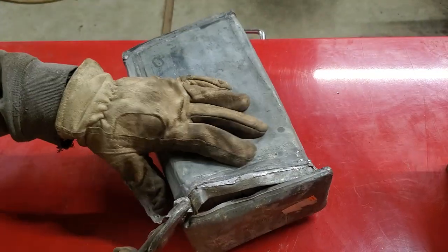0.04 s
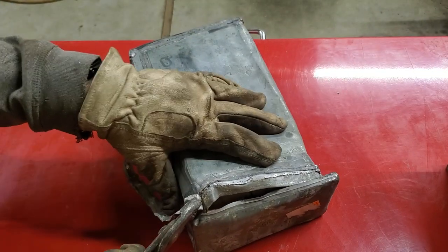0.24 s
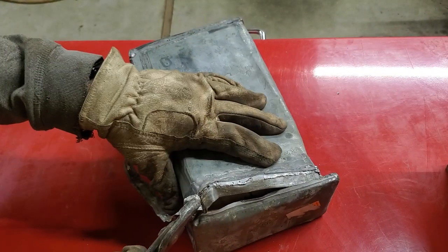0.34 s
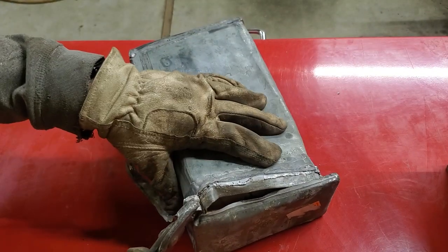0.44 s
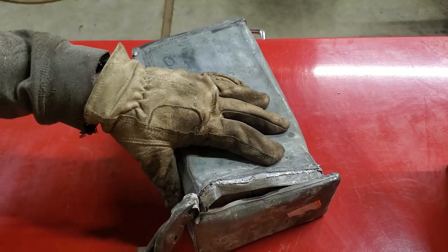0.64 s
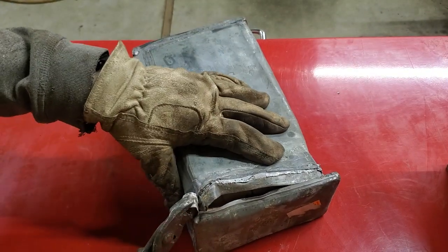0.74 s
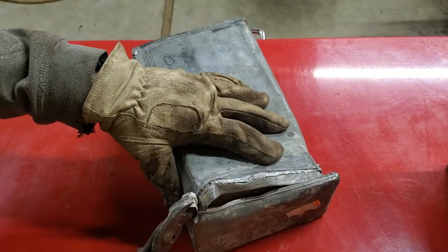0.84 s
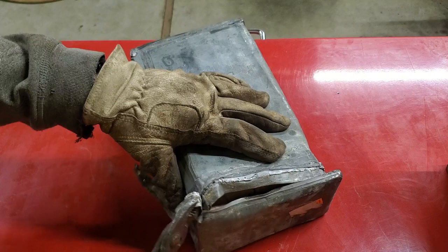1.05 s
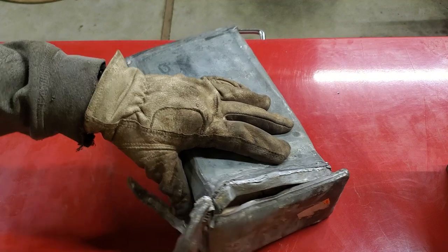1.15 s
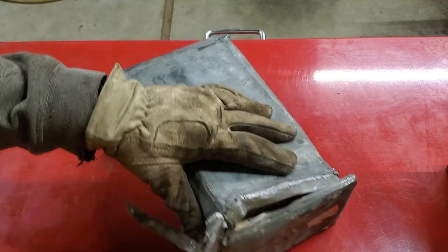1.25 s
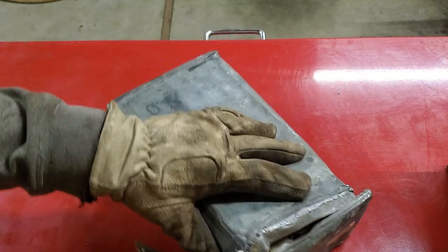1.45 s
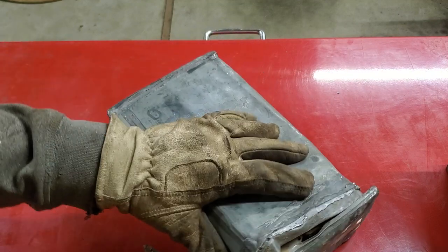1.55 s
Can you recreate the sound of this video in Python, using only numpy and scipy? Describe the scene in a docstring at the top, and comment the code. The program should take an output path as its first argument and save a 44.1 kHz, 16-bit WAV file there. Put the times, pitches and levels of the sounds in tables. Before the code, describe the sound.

Close stereo pickup in a workshop: a thin metal box rubs on a bench, clatters loudly early, snaps and clicks in the middle, then is set down with a lighter, jingling double knock and low thumps.

```python
"""A gloved hand rocks and turns a sheet-metal tin on a steel bench; two close microphone ports listen.
Throughout, the base rubs (lumpy rumble and fine hiss) over a faint mains hum. First the tin knocks on the
bench (low modes, clatter, crack) and a loose bit jingles (many small touches ringing high modes).
Then come dull ticks (single modes), seam snaps (noise bursts) and tool clicks (scrapes ringing modes).
The turned tin knocks and jingles again, and two thumps follow. Every hit leaves a diffuse room tail."""
import sys
import numpy as np
from scipy import signal
from scipy.fft import rfft, irfft
from scipy.io import wavfile
from scipy.ndimage import uniform_filter1d

SR = 44100
rng = np.random.default_rng(int(sys.argv[2]) if len(sys.argv) > 2 else 0)


def transcribe(u):
    """Save the signal u as a 16-bit wav file named by the first command-line argument.

    u: samples, shape (n,) or (channels, n), limited to [-1, 1]; the rate is SR.
    q: integer samples, one column per channel.
    """
    v = np.clip(np.atleast_2d(u).T, -1, 1)
    q = np.round(v * 32767).astype(np.int16)
    wavfile.write(sys.argv[1], SR, q)


def boost(x):
    """Linear amplitude factor 10**(x/20) for a level x in decibels (scalar or array-like)."""
    u = np.asarray(x, float) / 20
    return 10 ** u


N = 72765  # length in samples


def evened(x):
    """Scales a sound to rms 1."""
    return x / np.sqrt(np.mean(x ** 2) + 1e-20)


def read(points, hz):
    """Reads a table between its points, on a log-frequency axis."""
    f, value = np.transpose(points)
    return np.interp(np.log(hz + 1), np.log(f + 1), value)


def add(mix, s, sound):
    """Mixes a two-row sound (mid, side) in at time s, cutting it at the end."""
    part = mix[:, round(s * SR):][:, :sound.shape[1]]
    part += sound[:, :part.shape[1]]


def coloured(colour, size):
    """Two rows of noise, shaped to the given spectrum and scaled to rms 1."""
    spectrum = rfft(rng.standard_normal((2, size)))
    gain = boost(read(colour, np.fft.rfftfreq(size, 1 / SR)))
    return evened(irfft(spectrum * gain, size))


def dying(x, t60):
    """Lets every frequency band fall by 60 dB in its own time, as treble and bass die differently."""
    hz, t, bands = signal.stft(x, SR, nperseg=256)
    band_t60 = np.maximum(read(t60, hz), .01)[:, None]
    faded = bands * boost(-60 * t / band_t60)
    return signal.istft(faded, SR, nperseg=256)[1][:, :x.shape[1]]


def lumps(smooth_s):
    """Random wander of rms 1, made slower by smoothing noise twice."""
    size = round(smooth_s * SR)
    once = uniform_filter1d(rng.standard_normal(N), size)
    return evened(uniform_filter1d(once, size))


def burst(colour, db, t60):
    """A crack of coloured noise: a rise of 0.57 ms, then a steady fall in dB."""
    t = np.arange(SR // 3) / SR
    rise = np.minimum(t / 0.00057, 1)
    return coloured(colour, len(t)) * rise * boost(db - 60 * t / t60)


# mains hum: (f/Hz, level/dB)
HUM_TONES = [(120, -62.5)]


def hum():
    """Steady mains tone that starts at a random point of its cycle."""
    t = np.arange(N) / SR
    return sum(boost(db) * np.sin(2 * np.pi * (hz * t + rng.random())) for hz, db in HUM_TONES)


# how long the workshop rings: (f/Hz, 60 dB fall time/s)
ROOM_FADE = [(100, 1), (1000, 0.22), (6000, 0.36), (14000, 0.23)]


def room(hits):
    """Diffuse tail of the workshop: dying noise, 6 ms late, follows every hit."""
    tail = dying(rng.standard_normal((2, SR // 2)), ROOM_FADE)
    tail = np.pad(tail / np.linalg.norm(tail[0]), ((0, 0), (round(.006 * SR), 0)))
    return signal.fftconvolve(hits, tail, axes=1)[:, :N]


# how strongly the base rubs: (t/s, rumble level/dB, hiss level/dB, top hiss level/dB)
RUB_LEVELS = [(0.0, -47, -52.5, -52), (0.156, -42.5, -53.5, -48.5), (0.248, -57, -60.5, -62),
              (0.39, -37.5, -63, -67), (0.578, -47, -55, -52.5), (0.72, -42.5, -52.5, -50.5),
              (0.836, -47, -58, -66), (0.988, -43.5, -57, -59.5), (1.268, -49.5, -57, -51),
              (1.392, -47.5, -53.5, -49), (1.488, -48, -54, -49), (1.65, -41.5, -54, -52)]
# spectra of rumble, hiss and top hiss: (f/Hz, relative level/dB per Hz)
RUMBLE_COLOUR = [(15, -58), (25, -71), (44, 0.5), (65, -0.5), (248, -9.5), (300, -15.5), (394, -13),
                 (468, -14), (537, -14), (1500, -37.5), (1950, -24), (3300, -120)]
HISS_COLOUR = [(410, -4), (700, 2), (1530, -1.5), (1810, -3.5), (2530, 0), (2800, -3.5), (6520, -3),
               (8000, -9), (10400, -63), (17600, -120)]
TOP_COLOUR = [(4710, -73), (8000, -14), (11300, 1), (13900, -2.5), (15800, -9), (16300, -46), (16500, -58)]


def rubbing():
    """Friction of the base on the bench: lumpy rumble and gritty fine hiss."""
    s, rumble_db, hiss_db, top_db = np.transpose(RUB_LEVELS)
    t = np.arange(N) / SR
    grit_db = 0.5 * lumps(0.0037)
    lumps_db = 1 * lumps(0.0015)
    rumble = coloured(RUMBLE_COLOUR, N) * boost(np.interp(t, s, rumble_db) + lumps_db)
    hiss = coloured(HISS_COLOUR, N) * boost(np.interp(t, s, hiss_db))
    top_hiss = coloured(TOP_COLOUR, N) * boost(np.interp(t, s, top_db))
    return rumble + (hiss + top_hiss) * boost(grit_db)


# dull ticks and thumps of handling: (t/s, level/dB, f/Hz, 60 dB fall time/s)
TICK_EVENTS = [(0.601, -44, 2080, 0.019), (.642, -44, 538, 0.084), (.683, -29, 240, 0.038),
               (0.7144, -42.5, 2970, 0.034), (.714, -46.5, 1357, .06), (0.76, -47.5, 1425, 0.067),
               (0.76, -46.5, 1004, 0.064), (0.956, -51, 226, 0.1), (1.0174, -32.5, 265, 0.047),
               (1.366, -31, 162, 0.11), (1.404, -37, 216, 0.14)]


def ticks(hits):
    """Each touch rings one panel: a single damped mode, swelling over its first cycle."""
    t = np.arange(SR // 5) / SR
    for s, db, hz, t60 in TICK_EVENTS:
        swell = np.minimum(t * hz, 1)
        mode = boost(db - 60 * t / t60) * swell * np.sin(2 * np.pi * hz * t)
        add(hits, s, np.ones((2, 1)) * mode)


# tool clicking on the seam: (t/s, level/dB, 60 dB fall time of the scrape/s)
CLICK_EVENTS = [(0.9069, -35, 0.027), (0.9506, -34, 0.033), (0.9665, -34.5, 0.021), (1.0174, -40, 0.013)]
# modes of the tool's tip: (f/Hz, relative level/dB before division by root of fall time, 60 dB fall time/s)
TIP_MODES = [(1230, -7, .012), (2570, -7, .012), (3800, -4, .003), (5300, 0, .004), (6300, -1, .007),
             (8800, -2, .002), (11500, -3, .003), (14000, -6, .0015)]


def clicks(hits):
    """A short scrape of noise rings the modes of the tool's tip."""
    t = np.arange(SR // 10) / SR
    modes = 0
    for hz, level_db, ring_s in TIP_MODES:
        # the root keeps short and long modes comparable in energy
        modes = modes + boost(level_db - 60 * t / ring_s) * np.sin(2 * np.pi * hz * t) / np.sqrt(ring_s)
    for s, db, t60 in CLICK_EVENTS:
        scrape = rng.standard_normal((2, len(t))) * boost(-60 * t / t60)
        ringing = signal.fftconvolve(scrape, modes[None], axes=1)
        add(hits, s, boost(db) * ringing / np.linalg.norm(modes))


# seam snapping: (t/s, level/dB, 60 dB fall time/s)
SNAP_EVENTS = [(0.581, -54, 0.042), (.616, -44, 1), (0.7144, -25, 0.28), (0.7253, -31.5, 0.05),
               (0.777, -39, .12), (1.0185, -48, 0.29)]
# bright spectrum of a snap: (f/Hz, relative level/dB per Hz)
SNAP_COLOUR = [(470, -55), (800, -43), (2100, -38), (2600, -23), (6550, -7), (7720, -10.5), (11400, 4.5),
               (15500, -4), (16500, -20)]


def snaps(hits):
    """The seam lets go: a bright noise burst that opens with a sharp tip."""
    for s, db, t60 in SNAP_EVENTS:
        add(hits, s, burst(SNAP_COLOUR, db, t60))
        add(hits, s, burst(SNAP_COLOUR, db + 9, .018))  # tip: 9 dB stronger, gone fast


# loose bit rattling after a knock: (strongest at t/s, level/dB, spread/s)
RATTLE_EVENTS = [(0.249, -34, 0.017), (0.289, -37.5, 0.012), (0.375, -40, 0.0028), (1.303, -30, 0.013)]
# modes of the loose bit: (f/Hz, relative level/dB, 60 dB fall time/s)
JINGLE_MODES = [(9840, -6, .022), (10450, -8, .018), (11430, -8, .015), (11860, -2, .05),
                (12190, -10, .015), (13600, -6, .025), (14250, -1, .03), (14700, -8, .015),
                (15090, -7, .02)]


def rattles(hits):
    """Many small touches, swelling and fading, each ringing the modes differently."""
    touches_per_s, left_share = 1500, 0.71
    t = np.arange(SR // 4) / SR
    for s, level_db, spread_s in RATTLE_EVENTS:
        swell = np.exp(-.5 * (t / spread_s - 2) ** 2)  # peaks two spreads in
        touches = (rng.random(len(t)) < touches_per_s / SR) * swell
        jingle = 0
        for hz, db, t60 in JINGLE_MODES:
            mode = boost(db - 60 * t / t60) * np.sin(2 * np.pi * hz * t)
            strikes = touches * rng.standard_normal((2, len(t)))
            jingle = jingle + signal.oaconvolve(strikes, mode[None], axes=1)[:, :len(t)]
        mid, side = jingle
        leaning = np.array([mid, side + left_share * mid])  # mid copied to side leans left
        add(hits, s - 2 * spread_s, boost(level_db) * leaning)


# tin knocking on the bench: (t/s, ring level/dB, clatter level/dB, crack level/dB, 0 before or 1 after the turn)
KNOCK_EVENTS = [(0.2215, -18, -22, -22.5, 0), (.235, -21.5, -25.5, -17, 0), (.2412, -20.5, -31.5, -26, 0),
                (0.26, -23.5, -33, -28, 0), (0.3635, -21.5, -31, -35, 0), (1.2732, -28, -26, -28.5, 1),
                (1.288, -24.5, -33.5, -44, 1), (1.3136, -27.5, -43, -39, 1)]
# modes of tin and bench, one list before and one after the turn:
# (f/Hz, relative level/dB, 60 dB fall time/s, held to 0.22 s at most)
BODY_MODES = [
    [(96.2, 0, 0.11), (164, -6, .22), (262.6, -5, 0.17), (322, -13.5, 0.35), (376.4, -8, 0.1),
     (459.8, -11.5, 0.18), (538, -3.5, 0.063), (607, -9.5, .12), (658, -28, 0.16), (826, -25, 0.31),
     (993, -19.5, .16)],
    [(87.5, -4, .12), (161, -5.5, .25), (208.6, -1, 0.095), (269, -6.5, 0.1), (401.5, -11, 0.25),
     (450, -8, 0.16), (520.3, -9, 0.19), (704, -4, 0.051), (826, -27, 0.14)],
]
# spectra of clatter and crack: (f/Hz, relative level/dB per Hz)
CLATTER_COLOUR = [(24, -39), (40, -57), (130, -3.5), (345, -4), (660, -6), (780, -16.5), (1680, -18),
                  (5440, -20), (7730, -23.5), (11600, -20), (16000, -32)]
CRACK_COLOUR = [(500, -1), (1800, -12.5), (4000, -2.5), (5500, 5.5), (8000, -4), (11000, 5), (16500, -13)]
# how long the clatter lasts: (f/Hz, 60 dB fall time/s)
CLATTER_FADE = [(60, 0.8), (300, 0.24), (1000, 0.26), (4000, 0.22), (12000, 0.32)]


def knocks(hits):
    """Tin strikes bench: low modes ring, sheet metal clatters, and the touch itself cracks."""
    t = np.arange(SR // 2) / SR
    for s, ring_db, clatter_db, crack_db, turned in KNOCK_EVENTS:
        ring = 0
        for k, (hz, db, t60) in enumerate(BODY_MODES[int(turned > .5)]):
            mode = boost(db - 60 * t / min(t60, .22)) * np.sin(2 * np.pi * hz * t)
            ring = ring + mode * [[1], [.5 * (-1) ** k]]  # modes lean left and right in turn
        rise = np.minimum(t / 0.00033, 1)
        clatter = dying(coloured(CLATTER_COLOUR, len(t)), CLATTER_FADE) * rise
        add(hits, s, -boost(ring_db) * ring + boost(clatter_db) * clatter)
        add(hits, s, burst(CRACK_COLOUR, crack_db, 0.035))


def scene():
    """All sounds as two rows, mid (left plus right) and side (left minus right)."""
    hits = np.zeros((2, N))
    ticks(hits)
    clicks(hits)
    snaps(hits)
    rattles(hits)
    knocks(hits)
    return hum() + boost(-13) * room(hits) + rubbing() + hits


def low_pass(x):
    """Removes everything above the highest recorded frequency."""
    return signal.sosfilt(signal.butter(12, 16800, fs=SR, output="sos"), x)


# treble shape: a dip near 8 kHz and a cutoff at the top near 16 kHz: (f/Hz, level/dB)
TREBLE_SHAPE = [(6600, -1), (7500, -10), (8500, -12.5), (9600, -7), (15700, -4.5), (16400, -32)]
# width of the stereo picture: (f/Hz, gain of side against mid/dB)
SIDE_GAIN = [(60, -22), (170, -19.5), (350, -6), (650, -5.5), (1100, 1.5), (15000, -1)]
# balance of the ports: (f/Hz, left minus right level/dB)
PORT_LEAN = [(60, -1.16), (380, 1.1), (2380, 1.7), (15000, 0.068)]


def record(dry):
    """Two close ports share the bass and differ in the treble; a high-pass thins the bass."""
    hz = np.fft.rfftfreq(N, 1 / SR)
    mid, side = rfft(dry) * boost(read(TREBLE_SHAPE, hz))
    side = side * boost(read(SIDE_GAIN, hz))
    lean = boost(read(PORT_LEAN, hz) / 2)  # half up on the left, half down on the right
    ports = irfft(np.array([(mid + side) * lean, (mid - side) / lean]), N)
    bass_cut = signal.butter(3, 63, "high", fs=SR, output="sos")  # 63 Hz
    ports = signal.sosfilt(bass_cut, ports)
    return low_pass(ports)


dry = scene()
out = record(dry)
transcribe(out)
```